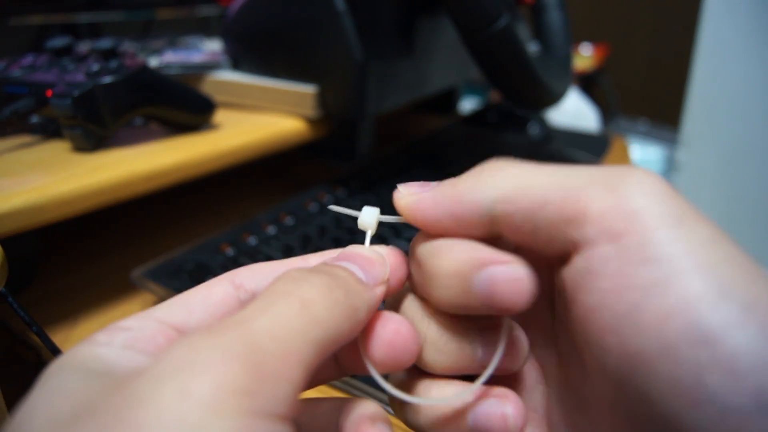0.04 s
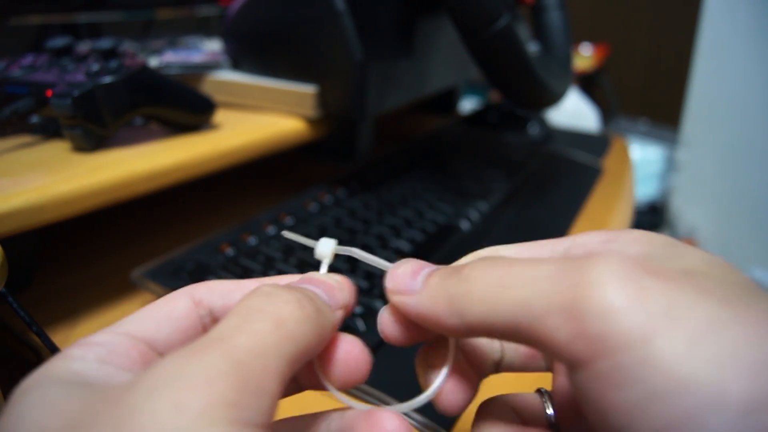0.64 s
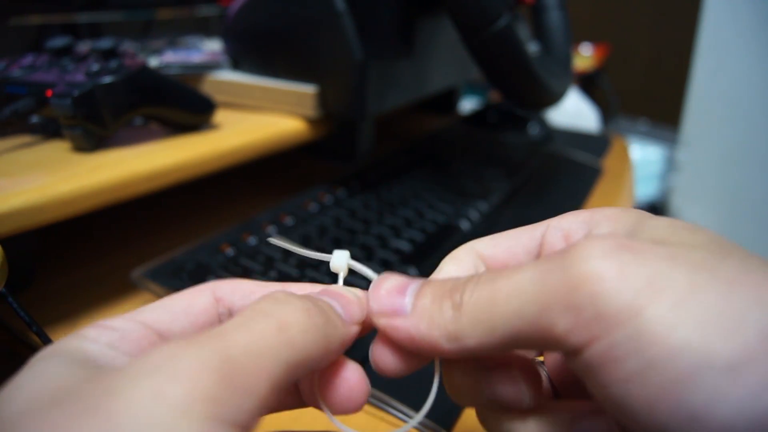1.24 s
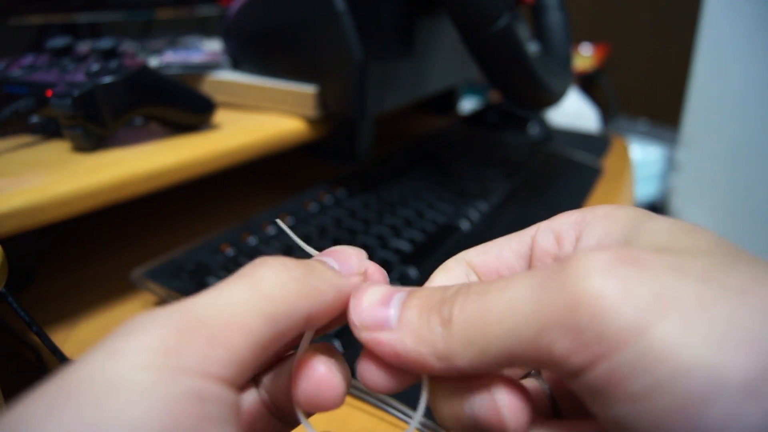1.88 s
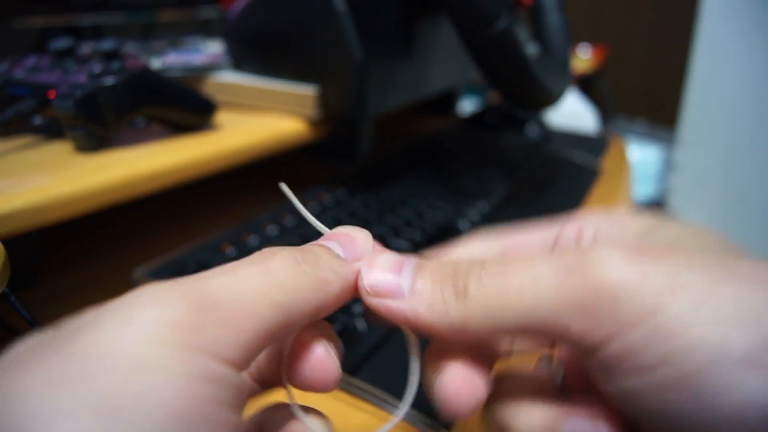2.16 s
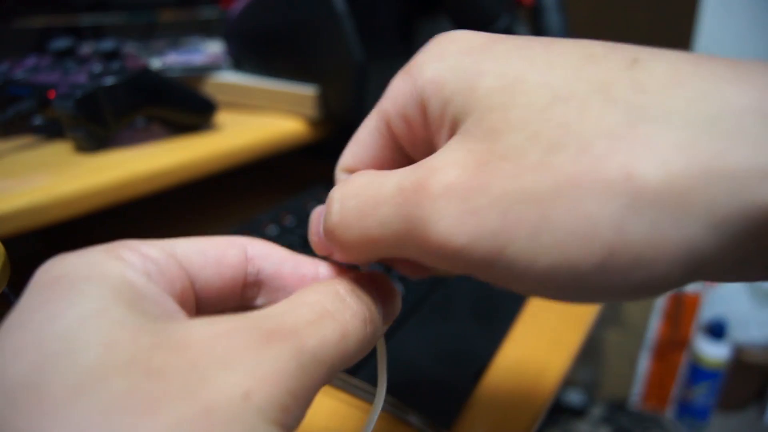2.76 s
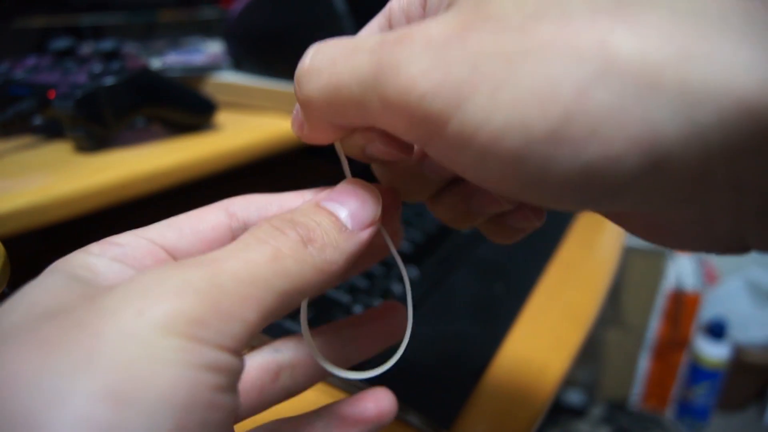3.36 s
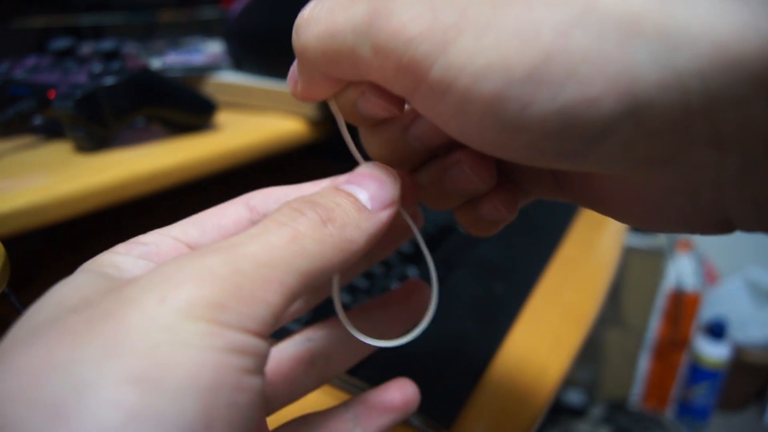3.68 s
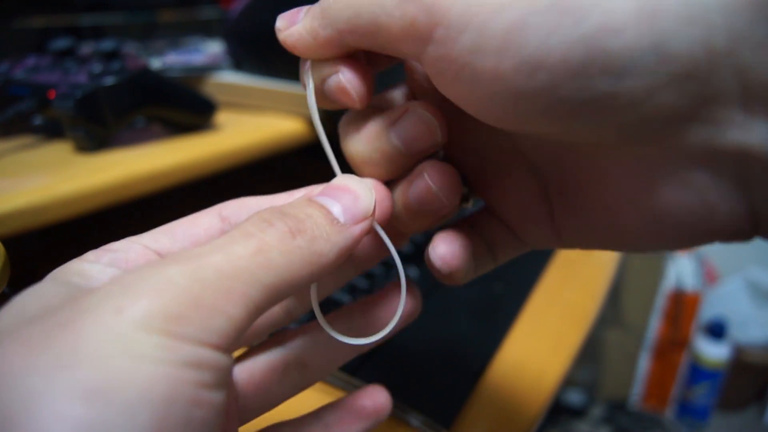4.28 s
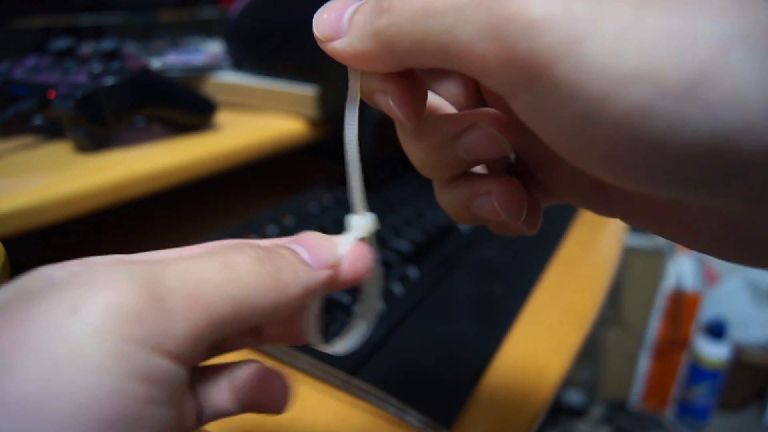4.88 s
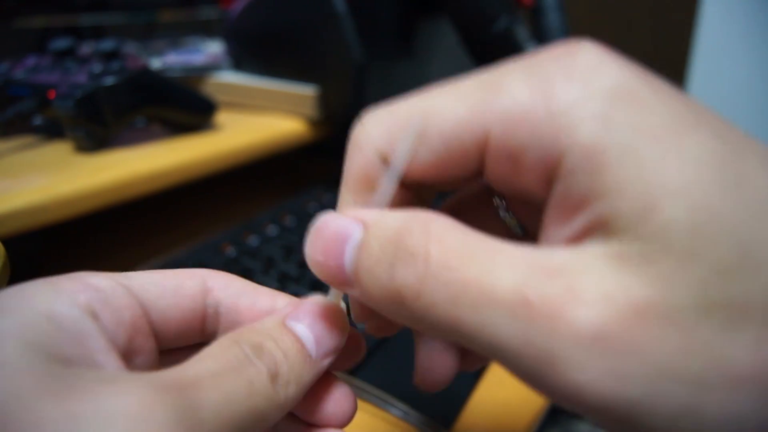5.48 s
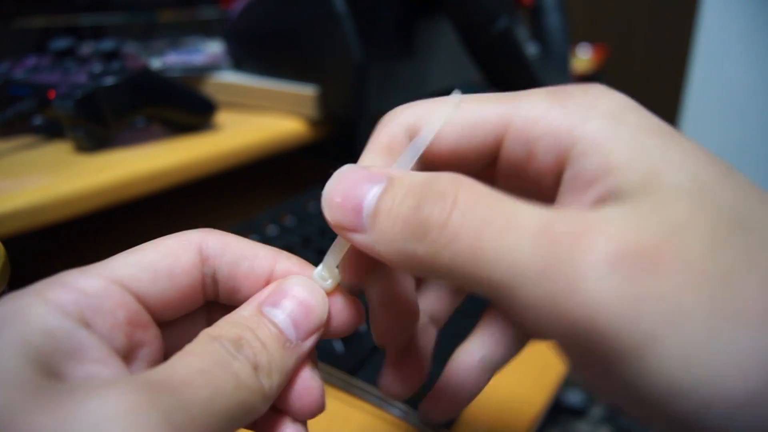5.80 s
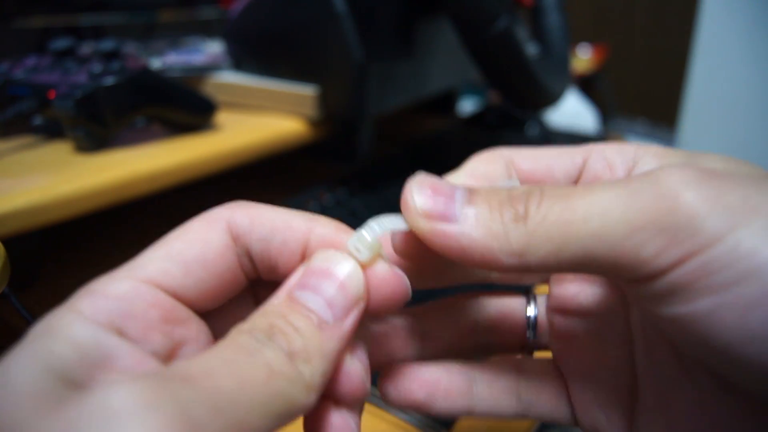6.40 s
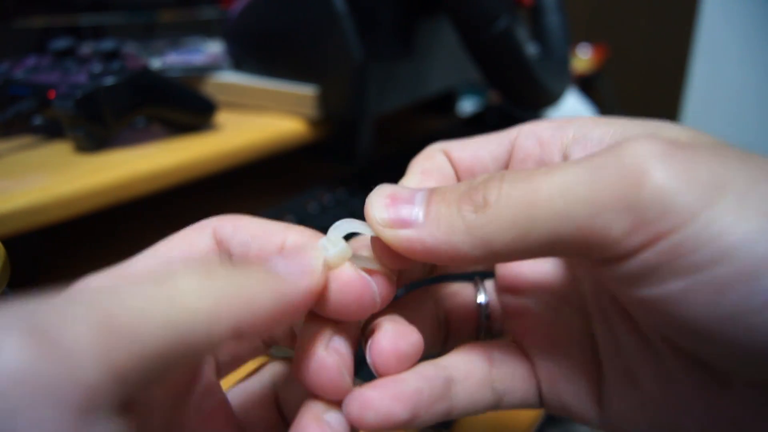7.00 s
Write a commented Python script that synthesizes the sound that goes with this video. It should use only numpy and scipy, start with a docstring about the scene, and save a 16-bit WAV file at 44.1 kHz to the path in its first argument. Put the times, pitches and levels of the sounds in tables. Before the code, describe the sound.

Computer fans give off a steady hum and airy rush in a small room. Close up, a nylon zip tie is handled with faint rubs and ticks, then clicks and gives a short squeak as it is threaded. Quick bursts of crisp clicks follow as it is tugged tighter, each with a slight room reflection. Light fingernail taps and soft sliding on the plastic finish.

```python
"""Zip tie pulled tight

A small room, the camera's microphone pair above a desk, a nylon zip tie worked by hand close in front.
The tip sticks and slips into the head with a squeak, then the pawl snaps over the teeth in short runs,
brighter for a harder, faster pull, and the room answers each snap. Fingers slide and tap on the plastic.
Computer fans hum and rush throughout, a little to the left; a faint deep drone swells and fades."""
import sys
import numpy as np
from scipy import signal
from scipy.fft import rfft, irfft
from scipy.io import wavfile

SR = 44100
rng = np.random.default_rng(int(sys.argv[2]) if len(sys.argv) > 2 else 0)


def transcribe(u):
    """Save the signal u as a 16-bit wav file named by the first command-line argument.

    u: samples, shape (n,) or (channels, n), limited to [-1, 1]; the rate is SR.
    q: integer samples, one column per channel.
    """
    v = np.clip(np.atleast_2d(u).T, -1, 1)
    q = np.round(v * 32767).astype(np.int16)
    wavfile.write(sys.argv[1], SR, q)


N = 319725
TIME, FREQS = np.arange(N) / SR, np.fft.rfftfreq(N, 1 / SR)

# spectrum of the fans' rushing air: frequency_hz, density_db
RUSH_SPECTRUM = [(25, -100), (90, -107), (150, -101), (220, -88), (330, -79), (500, -82.5), (800, -80),
                 (1100, -84.5), (1800, -90.5), (2800, -95.5), (4000, -97), (6000, -103), (9000, -111),
                 (14000, -117)]
# stereo width of the rush: frequency_hz, side_minus_mid_db
RUSH_WIDTH = [(60, -22), (300, -13.5), (600, -6), (900, -5.5), (1400, -4), (2000, 1), (14000, -1.2)]
# shaft and blade tones of the fans: pitch_hz, level_db, left_lead_rad
HUM_TONES = [(87.8, -88, 0.073), (146.9, -78, 0.24), (186, -78, 0.85), (231.4, -67, 0.56),
             (292.3, -68.5, .2), (344.5, -62.5, 0.49), (437.8, -66.5, 0.78), (592, -68, 0.99),
             (693, -61.5, 0.42), (735.4, -62, 0.87), (868, -67.5, .9), (882.8, -61.5, 0.48),
             (918.5, -66, 0.35), (1048, -72, 2.1), (1068, -70.5, .8), (1178, -69.5, 0.69),
             (1573, -73, 1.86), (1770, -73, 0.5), (2641, -75.5, 0.25), (5440, -83, 1.7), (6130, -91, 1.1),
             (7900, -86, 1.6)]
# fingertips sliding on the strap: middle_s, half_length_s, level_db, centre_hz
FINGER_SLIDES = [(0.04, 0.043, -55, 1770), (0.047, 0.043, -64, 4770), (0.365, 0.031, -56, 5000),
                 (0.958, .06, -67, 5500), (4.532, 0.025, -62, 5800), (5.598, 0.023, -59, 1600),
                 (5.616, .04, -63, 5060), (6.03, 0.071, -65, 4170), (7.045, 0.038, -56.5, 1800)]
# strap and fingernails knocking on the head: start_s, level_db, brightness_db_per_octave
HEAD_TAPS = [(0.3634, -42.5, -12), (0.8144, -49, -9), (1.8416, -39, -10), (1.8521, -31, -14.5),
             (4.5383, -40, -16), (5.0525, -37, -6.5), (5.64, -50, -5), (6.777, -50, -6)]
# resonances of head and strap: pitch_hz, width_hz, left_db, right_db
TIE_RESONANCES = [(830, 170, -4, -4), (2170, 800, -6, -8), (2600, 530, 0, 2), (4100, 440, 8, 5.5),
                  (5000, 350, -3, 2.5), (5500, 600, 1, -1), (6310, 340, 6.5, 1.5), (6650, 500, -5, -2),
                  (7650, 1900, 1, 0), (9200, 1500, -19, 0.5), (9900, 430, -4, 8.5), (11500, 310, -13, 1),
                  (12100, 380, 3, -7), (13300, 760, 1, -6)]
# colour of the room's answer: frequency_hz, gain_db
ROOM_SPECTRUM = [(200, 7), (1500, -0.5), (4500, -3.5), (8000, -3.5), (11000, -4), (14000, -5)]
# the pawl snapping off each tooth: start_s, level_db
PAWL_SNAPS = [(1.975, -32.5), (2.0569, -29), (3.0584, -30), (3.0755, -32), (3.1, -31), (3.1242, -30.5),
              (3.3094, -29.5), (3.5199, -30), (3.5352, -27.5), (3.5476, -31), (3.5527, -27), (3.557, -30.5),
              (3.5623, -28.5), (3.5683, -28.5), (3.5748, -29), (3.5824, -27), (3.5932, -28.5),
              (3.8594, -27.5), (3.888, -27), (3.8953, -28.5), (3.9093, -28.5), (3.933, -31.5), (4.052, -28),
              (4.0662, -28.5), (4.0802, -28.5), (4.104, -31), (4.2304, -30.5), (4.2628, -29), (4.288, -30)]
# resonances of the pinched strap: pitch_hz, width_hz, level_db
PINCH_RESONANCES = [(2840, 710, -8), (4100, 580, 2.5), (4430, 610, -.5)]
# swells of the deep drone: peak_s, half_width_s, level_db
DEEP_SWELLS = [(2.83, .17, -72), (4.1, 1.2, -74), (4.56, .24, -76)]
# the hands jolting as the strap gives: start_s, level_db
HAND_JOLTS = [(3.05, -65), (3.505, -61), (3.885, -62), (3.915, -67), (4.05, -62), (4.26, -65)]
# dips in the microphones' response: centre_hz, half_width_hz, gain_db
MICROPHONE_DIPS = [(614, 57.5, -7.5), (1376, 144, -11), (2372, 188, -11), (3476, 276, -6)]

LEFT_RIGHT = np.array([[1], [-1]])


def undb(db):
    """Decibels to gain."""
    return 10 ** (np.asarray(db) / 20)


def unit(x):
    """Scale to a mean energy of one per channel, keeping the balance."""
    return x / np.sqrt(np.mean(np.sum(x ** 2, axis=-1)))


def colour(points, hz):
    """Gain of a (frequency_hz, gain_db) curve on a log-frequency axis."""
    points_hz, db = np.transpose(points)
    return undb(np.interp(np.log(hz + 1), np.log(points_hz), db))


def walk(rate_hz):
    """A wander of about unit spread: random levels joined by straight lines."""
    knots = np.arange(0, N / SR + 1, .5 / rate_hz)
    return np.interp(TIME, knots, rng.standard_normal(len(knots))) * np.sqrt(3 / 2)


def ring(t, hz, width_hz, phase=0):
    """A damped mode whose spectral peak does not depend on its width."""
    return width_hz * np.exp(-np.pi * width_hz * t) * np.sin(2 * np.pi * hz * t + phase)


def fan_rush(gain_db=-0.27):
    """Steady air noise from the fans; the bass reaches both microphones alike."""
    width = colour(RUSH_WIDTH, FREQS)
    mid, side = rfft(rng.standard_normal((2, N)))
    pair = (mid + LEFT_RIGHT * width * side) / np.sqrt(1 + width ** 2)
    return irfft(pair * colour(RUSH_SPECTRUM, FREQS), N) * np.sqrt(SR / 2) * undb(gain_db)


def fan_hum(drift=0.000501, flutter_db=1.12):
    """Fan tones whose speed drifts slightly and whose strength flutters in the air stream."""
    out = np.zeros((2, N))
    for hz, db, lead in HUM_TONES:
        phase = 2 * np.pi * (rng.random() + hz * np.cumsum(1 + drift * walk(1.367)) / SR)
        strength = undb(db + flutter_db * walk(4.9))
        out += np.sqrt(2) * strength * np.sin(phase + LEFT_RIGHT * lead / 2)
    return out


def grip_shifts(count=8, half_length_s=0.079, level_db=-69, centre_hz=4700):
    """Rows for fainter slides, at random moments as the grip shifts."""
    return [(s, half_length_s, level_db, centre_hz) for s in rng.uniform(0, N / SR, count)]


def finger_slides(grain_db=2.5, width_octaves=0.7):
    """Skin catches on the plastic in a dense spray of tiny slips."""
    out = np.zeros((2, N))
    for middle_s, half_length_s, db, centre_hz in FINGER_SLIDES + grip_shifts():
        size = 2 * int(half_length_s * SR)
        grains = rng.standard_normal((2, size)) * undb(grain_db * rng.exponential(size=size))
        octaves = np.log2((np.fft.rfftfreq(size, 1 / SR) + 1) / centre_hz)
        hiss = irfft(rfft(grains) * np.exp(-(octaves / width_octaves) ** 2))
        slide = undb(db) * hiss / hiss.std() * np.hanning(size)
        start = max(int((middle_s - half_length_s) * SR), 0)
        out[:, start:start + size] += slide[:, :N - start]
    return out


def nylon_click(brightness, crack_db=-3.5, detune=0.013, scatter_db=2.0,
                rebound_s=0.000681, rebound_gain=0.91, desk_s=.00145, size=1024):
    """A crack, then head and strap ring; the bend runs back along the strap and the desk echoes it."""
    t, hz = np.arange(size) / SR, np.fft.rfftfreq(size, 1 / SR)
    body = np.zeros((2, size))
    for pitch_hz, width_hz, *channel_db in TIE_RESONANCES:
        # the grip shifts a little from click to click, and the modes with it
        tuned_hz = pitch_hz * (1 + detune * rng.standard_normal())
        gains = undb(np.array(channel_db) + scatter_db * rng.standard_normal())
        phases = rng.uniform(0, 2 * np.pi) + min(pitch_hz / 3500, .75) * rng.standard_normal((2, 1))
        body += gains[:, None] * ring(t, tuned_hz, width_hz, phases)
    lags_s = np.array([rebound_s, desk_s])[:, None, None] * (1 + 0.152 * rng.standard_normal((2, 2, 1)))
    rebound, desk_echo = np.exp(-2j * np.pi * hz * lags_s)
    body = unit(irfft(rfft(body) * (1 + rebound_gain * rebound + desk_echo)))
    crack = -unit(np.diff(ring(t, hz=5400, width_hz=5800), prepend=0))
    click = np.roll(body + undb(crack_db) * crack, size // 32, axis=-1)
    tilt_db = brightness * np.log2(np.maximum(hz, 3000) / 6000)  # flat below 3 kHz
    return unit(irfft(rfft(click) * undb(tilt_db)))


def room(x, wet_db=-1.0, t60_s=0.18, clutter_s=.002, wall_s=.0125, spread_s=.003, wall_db=4.0):
    """Nearby clutter scatters first, then the walls answer together; echoes differ as the hands move."""
    size = 10000
    t, hz = np.arange(size) / SR, np.fft.rfftfreq(size, 1 / SR)
    walls = np.exp(-((t - wall_s) / spread_s) ** 2)
    envelope = (t > clutter_s) * np.exp(-np.log(1000) * t / t60_s) * undb(wall_db * walls)
    tail = irfft(rfft(rng.standard_normal((2, size)) * envelope) * colour(ROOM_SPECTRUM, hz))
    direct = t == 0
    return signal.fftconvolve(x, direct + undb(wet_db) * unit(tail), axes=1)


def clicks_in_room(rows, gain_db, low_cut_hz, rock_db=1.0, delay_s=.0003):
    """One click and its echoes for each row; so small a part radiates no bass."""
    out = np.zeros((2, N))
    for start_s, db, brightness in rows:
        pan_db = rock_db * rng.standard_normal()  # the head rocks between the fingers
        click = room(nylon_click(brightness))
        start = int((start_s + delay_s) * SR)
        out[:, start:start + click.shape[1]] += click * undb(gain_db + db + LEFT_RIGHT * pan_db / 2)
    return signal.sosfilt(signal.butter(2, low_cut_hz, "high", fs=SR, output="sos"), out)


def head_taps():
    """Strap and fingernails knock lightly on the head."""
    return clicks_in_room(HEAD_TAPS, gain_db=12.0, low_cut_hz=2580)


def ratchet(usual_db=-29.5, usual_brightness=-1.24, tip_teeth=2.6, body_hz=(1510, 2430), body_db=-1.5):
    """The pawl snaps off each tooth, brighter the harder and faster the pull."""
    start_s, db = np.transpose(PAWL_SNAPS)
    tooth = np.arange(len(start_s))
    teeth_per_s = 1 / np.diff(start_s, prepend=0)
    brightness = usual_brightness + 0.47 * (db - usual_db) + .009 * teeth_per_s  # dB per octave
    brightness -= 3 * np.exp(-tooth / tip_teeth)  # duller at the tapered tip
    snaps = clicks_in_room(zip(start_s, db, brightness), gain_db=11.5, low_cut_hz=650)
    # the strap's free end grows with each tooth and adds body
    free_length = np.interp(TIME, start_s, tooth / tooth.max())
    body = signal.sosfilt(signal.butter(1, body_hz, "band", fs=SR, output="sos"), snaps)
    return snaps + undb(body_db) * free_length ** 2 * body


def tip_push(start_s=2.045, end_s=2.193, attack_s=0.0041, release_s=0.0065, bind_s=.062,
             bind_db=-49.5, free_db=-55.5, bind_hz=339.5, free_hz=199.6, rough_db=1.0):
    """Strength and slip rate of the tip in the head: it binds unevenly, and both fall as it frees."""
    elapsed_s = np.maximum(TIME - start_s, 0)
    binding = 1 / (1 + (elapsed_s / bind_s) ** 6.2)
    moving = np.clip(elapsed_s / attack_s, 0, 1) * np.clip(1 - (TIME - end_s) / release_s, 0, 1)
    db = free_db + (bind_db - free_db) * binding + rough_db * walk(60)
    slip_hz = free_hz + (bind_hz - free_hz) * binding
    return moving * undb(db), slip_hz


def tip_squeak(jitter=0.15, scatter_db=2, build_s=0.00074, size=512):
    """The strap sticks and slips in the head; each slip rings the pinched strap."""
    strength, slip_hz = tip_push()
    slip_count = np.floor(np.cumsum(slip_hz * (1 + jitter * walk(120))) / SR)
    slips = np.diff(slip_count, prepend=0) * undb(scatter_db * rng.standard_normal(N))
    slips *= strength * np.sqrt(SR / slip_hz)
    t = np.arange(size) / SR
    mic_phases = np.array([[0], [np.pi / 3]])  # the two microphones hear the strap out of step
    rings = sum(undb(db) * ring(t, hz, width_hz, mic_phases + k * np.pi / 2)
                for k, (hz, width_hz, db) in enumerate(PINCH_RESONANCES))
    soft_contact = 1 - np.exp(-(t / build_s) ** 2)
    return signal.fftconvolve(slips[None], unit(rings * soft_contact), axes=1)[:, :N]


def drone(pitch_hz=43.1):
    """A faint deep tone that comes and goes in smooth swells."""
    strength = sum(undb(db) * np.exp(-((TIME - peak_s) / half_width_s) ** 2)
                   for peak_s, half_width_s, db in DEEP_SWELLS)
    return np.sqrt(2) * strength * np.sin(2 * np.pi * pitch_hz * TIME)


def hand_jolts(pitch_hz=92, width_hz=28):
    """Soft, low thuds of the hands as the strap gives."""
    return sum(undb(db) * ring(np.maximum(TIME - start_s, 0), pitch_hz, width_hz) / width_hz
               for start_s, db in HAND_JOLTS)


def scene(fans_pan_db=0.9):
    """The tie close in front of the microphones, the fans a little to the left."""
    tie = ratchet() + head_taps() + room(tip_squeak(), wet_db=-5.0)[:, :N]
    fans = (fan_rush() + fan_hum()) * undb(LEFT_RIGHT * fans_pan_db / 2)
    return tie + finger_slides() + hand_jolts() + fans + drone()


def record(dry, top_hz=14000, offset=-.0025):
    """The camera's microphones have a row of dips; its converter cuts the top and sits just off zero."""
    dips_db = sum(db * np.exp(-((FREQS - hz) / half_width_hz) ** 2)
                  for hz, half_width_hz, db in MICROPHONE_DIPS)
    heard = irfft(rfft(dry) * undb(dips_db), N)
    top_cut = signal.ellip(10, .1, 70, top_hz, fs=SR, output="sos")
    return signal.sosfilt(top_cut, heard) + offset


dry = scene()
out = record(dry)
transcribe(out)
```